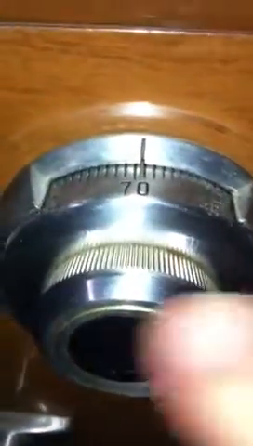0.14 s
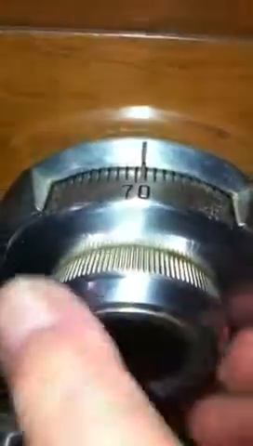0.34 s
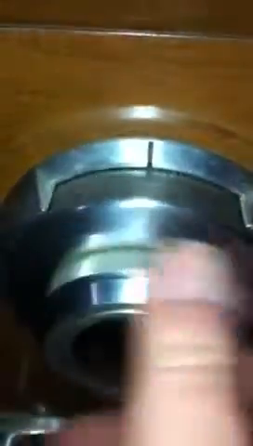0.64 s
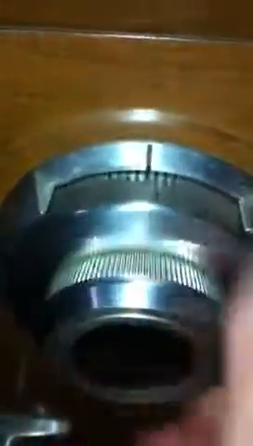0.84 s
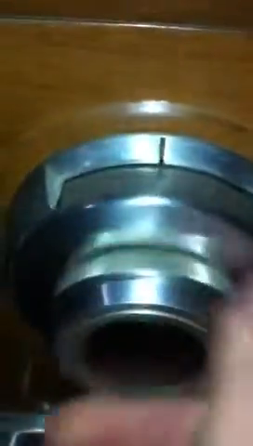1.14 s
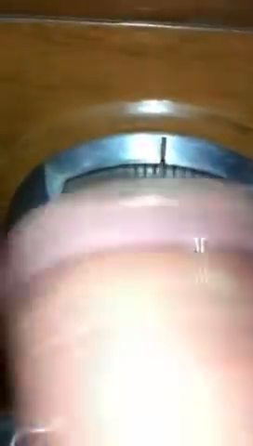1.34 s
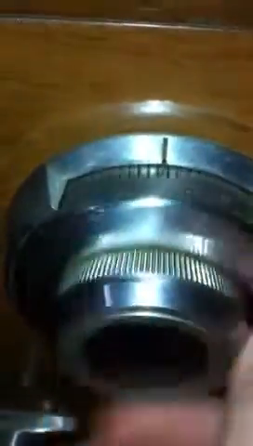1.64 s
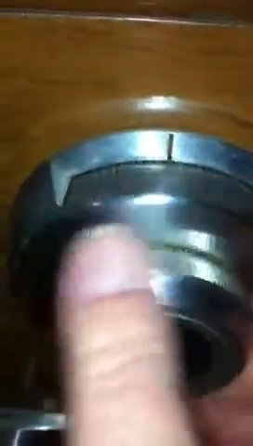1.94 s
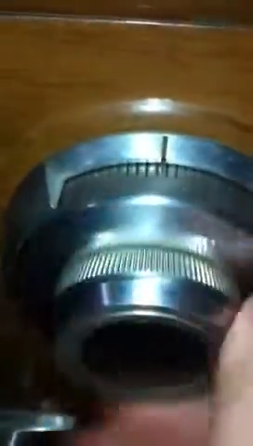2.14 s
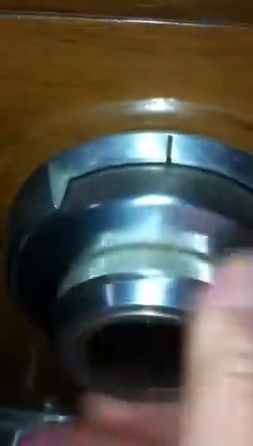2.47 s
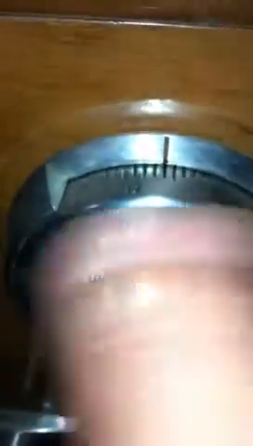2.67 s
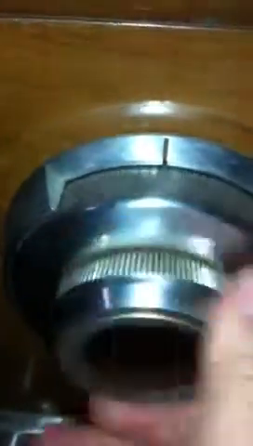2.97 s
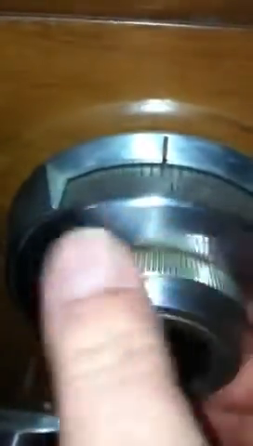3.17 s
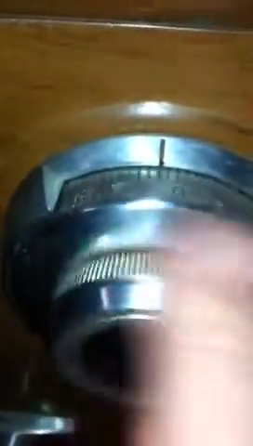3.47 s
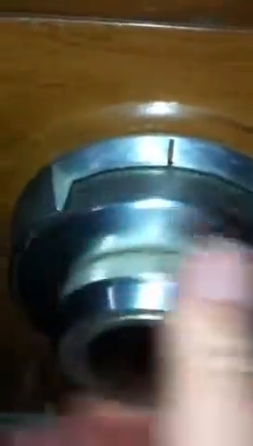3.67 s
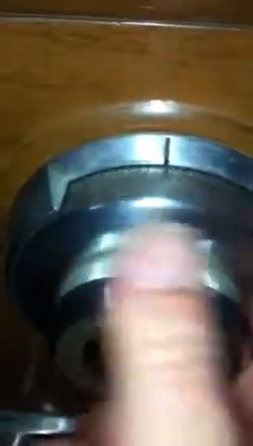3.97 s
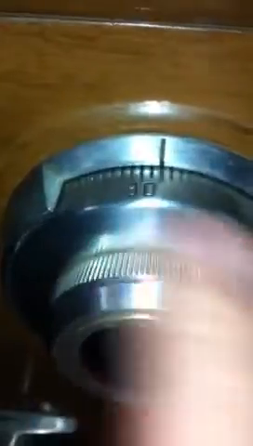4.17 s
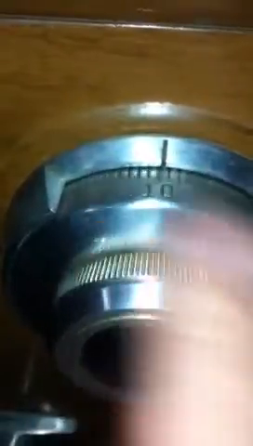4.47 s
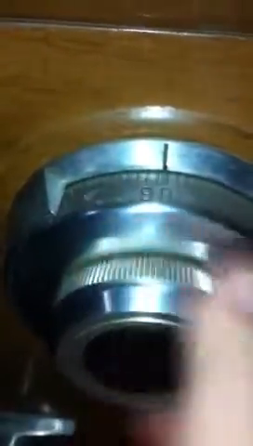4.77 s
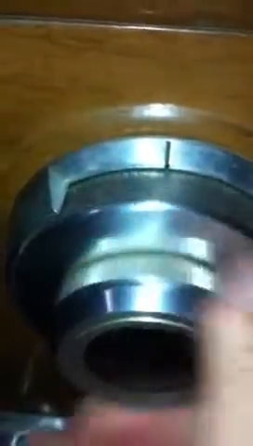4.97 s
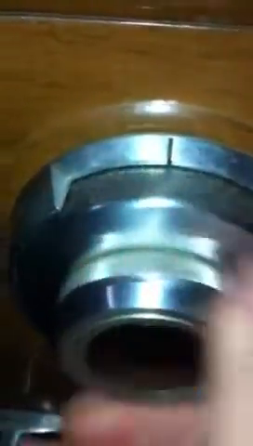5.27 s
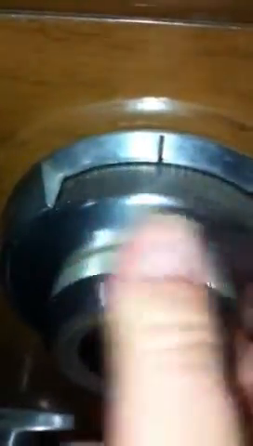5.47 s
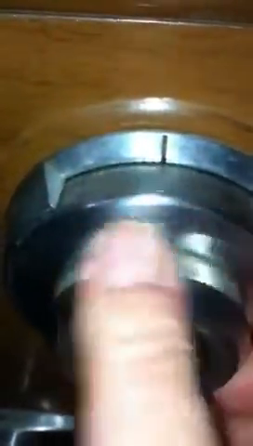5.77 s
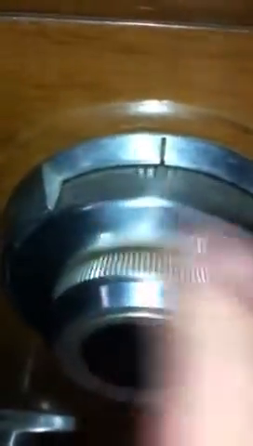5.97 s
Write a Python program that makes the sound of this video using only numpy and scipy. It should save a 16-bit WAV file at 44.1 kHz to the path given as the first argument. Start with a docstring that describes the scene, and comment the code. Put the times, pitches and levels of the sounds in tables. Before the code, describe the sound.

Close metallic ticking and soft scraping as a combination lock dial spins in short strokes, broken by sharp double clacks with a slight ring.

```python
"""A small quiet room: close by, a hand spins the steel dial of a combination safe in short strokes.
The thumb lands on the knob, the spindle rubs and ticks in its play, and once a turn the lock gives
a loud double clack. Each contact rings the dial, knocks the lock case and cracks in the small steel
parts; door plate and spring ring on faintly after a clack. A soft hiss opens; one dry snap falls midway."""
import sys
import numpy as np
from scipy import signal
from scipy.fft import rfft, irfft
from scipy.io import wavfile
from scipy.ndimage import uniform_filter1d

SR = 44100
rng = np.random.default_rng(int(sys.argv[2]) if len(sys.argv) > 2 else 0)


def materialize(psi):
    """Save the field psi as 16-bit PCM at rate SR to the path in sys.argv[1].

    A 1-D psi becomes a single channel; in a 2-D psi each row is a channel.
    """
    bounded = np.clip(np.atleast_2d(psi).T, -1, 1)
    quanta = np.round(bounded * 32767).astype(np.int16)
    wavfile.write(sys.argv[1], SR, quanta)


N = 269892
TIME = np.arange(N) / SR
LEAD_S = .01
HIT_TIME = np.arange(SR // 6) / SR - LEAD_S  # zero at contact


def from_db(db):
    """Decibels to gain."""
    return 10 ** (np.asarray(db) / 20)


def unit_rms(x):
    """Scale to rms 1."""
    return x / np.sqrt(np.mean(x ** 2) + 1e-20)


def at_level(hit, db):
    """Set the level of a hit's loudest 5 ms."""
    return hit * from_db(db) / np.sqrt(uniform_filter1d(hit ** 2, size=220).max())


def add(track, at_s, sound):
    """Mix a sound into the track."""
    start = max(0, round(at_s * SR))
    track[start:start + len(sound)] += sound[:N - start]


def coloured(spectrum, size=N):
    """Steady noise of a given spectral shape, rms 1."""
    hz, db = np.transpose(spectrum)
    bins_hz = np.fft.rfftfreq(size, 1 / SR) + 1
    gain = from_db(np.interp(np.log(bins_hz), np.log(hz), db))
    return unit_rms(irfft(rfft(rng.standard_normal(size)) * gain, size))


def resonate(force, modes):
    """Parallel resonances, alternating in sign."""
    out = 0
    for k, (hz, width_hz, db) in enumerate(modes):
        r = np.exp(-np.pi * width_hz / SR)
        poles = [1, -2 * r * np.cos(2 * np.pi * hz / SR), r * r]
        out += (-1) ** k * from_db(db) * signal.lfilter([1, 0, -1], poles, force) * (1 - r * r) / 2
    return out


# noise spectra: f/Hz, relative density/dB
FLOOR_SPECTRUM = [(18, -42.5), (30, -6.5), (53, -27), (124, 4), (233, 6), (287, -2.5), (540, -1), (844, -8),
                  (1100, -11), (2010, -17), (2480, -17), (2980, -18.5), (10200, -20.5), (14800, -19.5),
                  (16000, -27.5)]
HISS_SPECTRUM = [(150, -31), (250, -5), (386, -1), (597, -9.5), (955, -10), (1060, -9), (2050, -8),
                 (13000, -18.5), (16000, -26)]


def background(floor_db, hiss_db, rise_s, end_s, fade_s):
    """Steady room noise, and a soft hiss that rises, holds and fades."""
    swell = np.clip(np.minimum(TIME / rise_s, (end_s - TIME) / fade_s), 0, 1)
    floor = from_db(floor_db) * coloured(FLOOR_SPECTRUM)
    return floor + from_db(hiss_db) * swell * coloured(HISS_SPECTRUM)


# fingered knob, lock case: f/Hz, width/Hz, gain/dB
KNOB_MODES = [(843, 120, 7), (1310, 130, 0.5), (1572, 45, 3), (1840, 190, -0.5), (2476, 67, 6),
              (3580, 2300, -15.5), (12000, 3500, -18)]
CASE_MODES = [(470, 160, -16), (640, 100, -9), (732, 120, -5), (861, 102, 3), (907, 200, -8),
              (1310, 300, -17)]
# hand strokes: start/s, end/s, level/dB
STROKES = [(0.683, 0.856, -52.5), (1.144, 1.33, -54.5), (2.044, 2.239, -56), (2.483, 2.63, -59.5),
           (2.95, 3.04, -59.5), (3.732, 3.862, -48.5), (4.081, 4.193, -54), (4.401, 4.55, -60),
           (4.678, 4.745, -55.5), (5.301, 5.426, -53.5), (5.619, 5.715, -60.5), (5.869, 6.038, -56)]


def rubbing(slips_per_s, spread_db, clump_db, case_db, grit_db):
    """The turning spindle slips in tiny dry clumps, swelling and fading with each stroke."""
    drift = unit_rms(uniform_filter1d(rng.standard_normal(N), size=500))
    clumps = from_db(clump_db * np.clip(drift, -2, 2))
    sizes = rng.choice([-1, 1], N) * from_db(spread_db * np.minimum(rng.exponential(1, N), 4))
    slips = (rng.random(N) < slips_per_s / SR) * sizes * clumps
    grit = from_db(grit_db) * signal.lfilter(*signal.butter(2, [900, 3600], "band", fs=SR), slips)
    case = from_db(case_db) * resonate(slips, CASE_MODES)
    swell = np.zeros(N)
    for start_s, end_s, db in STROKES:
        progress = np.clip((TIME - start_s) / (end_s - start_s), 0, 1)
        swell += from_db(db) * np.sqrt(np.abs(np.sin(np.pi * progress)))
    return swell * unit_rms(resonate(slips, KNOB_MODES) + case + grit)


def contact_force(grip_s, rattle_db, rattle_s, blow, slide_db=-15, slide_s=0.0026):
    """A short slide, a blow within a burst of micro-impacts, then a settling rattle."""
    rise = np.maximum(HIT_TIME, 0) / grip_s
    slide = from_db(slide_db) * np.exp(-np.abs(HIT_TIME) / slide_s)
    rattle = from_db(rattle_db) * np.exp(-np.abs(HIT_TIME) / rattle_s)
    envelope = rise * np.exp(1 - rise) + np.where(HIT_TIME < 0, slide, rattle)
    force = envelope * rng.standard_normal(len(HIT_TIME))
    force[np.argmax(envelope)] += blow * np.linalg.norm(force)
    return force


# door: f/Hz, width/Hz, gain/dB
DOOR_MODES = [(365, 52, -9.5), (411, 23, -7), (466.8, 9.8, -1), (584, 40, -6)]
# finger landings: t/s, relative slap/dB, relative thud/dB, favoured f/Hz
TAPS = [(0.696, -53.5, -48.5, 476), (1.093, -43.5, -53, 473), (1.129, -56, -48.5, 450),
        (2.404, -54.5, -50, 433), (3.752, -42.5, -44, 542), (4.395, -47.5, -46.5, 454),
        (5.028, -39.5, -42.5, 550), (5.569, -41.5, -49.5, 475), (5.6, -41, -46, 357)]


def finger_taps(slap_trim_db, thud_trim_db, flesh_hz, fall_db_per_octave):
    """A soft finger slaps the knob; the push thuds in the door modes near the pitch it favours."""
    out = np.zeros(N)
    flesh = signal.butter(1, flesh_hz, fs=SR)
    for at_s, slap_db, thud_db, favoured_hz in TAPS:
        force = contact_force(grip_s=0.00082, rattle_db=-10.5, rattle_s=0.013, blow=0.54, slide_db=-24.5)
        door_modes = [(hz, width_hz, db - fall_db_per_octave * abs(np.log2(hz / favoured_hz)))
                      for hz, width_hz, db in DOOR_MODES]
        slap = at_level(signal.lfilter(*flesh, resonate(force, KNOB_MODES)), slap_db + slap_trim_db)
        thud = at_level(resonate(force, door_modes), thud_db + thud_trim_db)
        add(out, at_s - LEAD_S, slap + thud)
    return out


# dense door modes: f/Hz, relative density/dB
CLATTER_SPECTRUM = [(70, -20), (280, -11), (580, 4), (1000, -0.5), (1650, -7.5), (2100, -6.5), (4000, -9.5),
                    (6000, -20), (16000, -42)]


def door_clatter(decay_s, rise_s=0.00045):
    """Many close modes of the door answer at once and die quickly."""
    t = np.maximum(HIT_TIME, 0)
    return coloured(CLATTER_SPECTRUM, len(t)) * (1 - np.exp(-t / rise_s)) * np.exp(-t / decay_s)


# dial, small steel parts: f/Hz, width/Hz, gain/dB
DIAL_MODES = [(1660, 680, -10), (2328, 110, -1.5), (2429, 85, 12.5), (2660, 360, -4.5), (3420, 970, -26)]
STEEL_MODES = [(3890, 99, -11.5), (4220, 73, -6), (4870, 690, -16), (6205, 520, -1.5), (8140, 84, -9.5),
               (8885, 170, -0.5), (9800, 140, -5.5), (10630, 260, -0.5), (12090, 420, -2.5),
               (13300, 480, -18.5), (14500, 690, -5.5), (15600, 550, -23)]


def steel_contacts(rows, grip_s, rattle_db, rattle_s, slide_db, blow, dial_trim_db, case_trim_db,
                   steel_trim_db, edge_db, clatter_db, clatter_s, bright_hz):
    """Steel meets steel: the dial rings, the case knocks, small parts crack, the door clatters."""
    out = np.zeros(N)
    lowpass = signal.butter(1, bright_hz, fs=SR)
    highpass = signal.butter(2, 2900, "high", fs=SR)
    for at_s, dial_db, case_db, steel_db in rows:
        # heavy parts follow the blow, light ones the chatter
        force = contact_force(grip_s, rattle_db - 6, rattle_s, blow, slide_db)
        chatter = contact_force(grip_s, rattle_db, rattle_s, 0, slide_db)
        edge = from_db(edge_db) * signal.lfilter(*highpass, chatter)
        crack = signal.lfilter(*lowpass, resonate(chatter, STEEL_MODES) + edge)
        hit = at_level(resonate(force, DIAL_MODES), dial_db + dial_trim_db)
        hit += at_level(resonate(force, CASE_MODES), case_db + case_trim_db)
        hit += at_level(crack, steel_db + steel_trim_db)
        hit += at_level(door_clatter(clatter_s), (dial_db + case_db) / 2 + clatter_db)
        add(out, at_s - LEAD_S, hit)
    return out


# faint tick, relative to its stroke: dial/dB, case/dB, steel/dB
FAINT_TICK = (1, -0.86, -7)


def faint_tick_rows(gap_s, scatter_db):
    """The loose spindle touches its bearing unevenly through a stroke, harder in a stronger one."""
    rows = []
    for start_s, end_s, db in STROKES:
        times_s = start_s + gap_s * (np.arange(8) + rng.uniform(0, 1, size=8))
        levels_db = db + np.array(FAINT_TICK) + scatter_db * rng.standard_normal(size=(8, 3))
        rows += [(at_s, *parts_db) for at_s, parts_db in zip(times_s, levels_db) if at_s < end_s]
    return rows


# clear spindle ticks, relative levels: t/s, dial/dB, case/dB, steel/dB
TICKS = [(0.747, -44.5, -67, -52.5), (0.77, -44, -77, -52), (0.814, -50.5, -53.5, -62),
         (1.236, -48, -45.5, -43), (1.253, -42.5, -29.5, -35), (1.281, -47, -42, -48),
         (1.3005, -45.5, -54, -44), (1.716, -42, -29.5, -39.5), (2.173, -43, -54, -50),
         (2.503, -48, -50.5, -80), (2.899, -72, -51.5, -73), (2.954, -53.5, -50, -57),
         (2.989, -43.5, -43, -45), (3.0075, -43.5, -36, -38), (3.368, -39, -39.5, -48.5),
         (3.752, -42, -39, -44.5), (3.772, -37.5, -27.5, -42), (3.822, -64.5, -61.5, -48.5),
         (4.062, -44.5, -45.5, -59), (4.491, -49, -38.5, -47.5), (4.703, -44.5, -45.5, -52.5),
         (5.029, -37.5, -36.5, -42), (5.0795, -38.5, -27, -39), (5.3, -59, -43, -56.5),
         (5.347, -41.5, -47, -50), (5.364, -40, -48, -48), (5.391, -44, -45.5, -59),
         (5.941, -40, -43.5, -44), (5.958, -39.5, -33.5, -37.5), (5.986, -64, -42, -48),
         (6.016, -56, -46.5, -46.5)]


def light_ticks(rebounds):
    """Light contacts: the spindle in its play and the lock's rebounds."""
    rows = TICKS + rebounds + faint_tick_rows(gap_s=.045, scatter_db=3)
    return steel_contacts(rows, grip_s=.0014, rattle_db=-15, rattle_s=0.0092, slide_db=-15, blow=0.61,
                          dial_trim_db=0.7, case_trim_db=-3, steel_trim_db=0.25, edge_db=-13,
                          clatter_db=-4.5, clatter_s=0.0099, bright_hz=8905)


# lock turns: catch t/s, strength/dB, slack before catch/s, wait for drop/s, plate/dB, spring/dB
TURNS = [(1.629, 1, .0135, 0.033, -51.5, -65), (3.3938, 0.5, 0.0053, 0.047, -56.5, -54),
         (4.7684, 0.5, .0115, .042, -55, -47)]
# nudges, relative to turn strength: dial/dB, case/dB
CATCH_NUDGE = (-42.5, -36)
DROP_NUDGE = (-35, -41.5)


def nudges(wait_share):
    """Parts take up slack before each catch and drop, too softly to crack: dial and case answer."""
    out = np.zeros(N)
    for catch_s, db, slack_s, wait_s, *_ in TURNS:
        pair = (catch_s - slack_s, CATCH_NUDGE), (catch_s + wait_share * wait_s, DROP_NUDGE)
        for at_s, (dial_db, case_db) in pair:
            force = contact_force(grip_s=0.00078, rattle_db=-21.5, rattle_s=0.011, blow=0.33)
            ring = at_level(resonate(force, DIAL_MODES), db + dial_db)
            knock = at_level(resonate(force, CASE_MODES), db + case_db)
            add(out, at_s - LEAD_S, ring + knock)
    return out


# blows of a clack, relative levels: dial/dB, case/dB, steel/dB
CATCH = (-18, -23.5, -16)
DROP = (-20, -31, -23.5)
SEAT = (-22.5, -32.5, -19.5)


def double_clacks(seat_s, rebound_s, rebound_db):
    """The lock catches, drops and seats; catch and seat spring back once. Gives sound and rebound rows."""
    blows, rebounds = [], []
    for catch_s, db, _, wait_s, *_ in TURNS:
        drop_s = catch_s + wait_s
        catch, drop, seat = (catch_s, CATCH), (drop_s, DROP), (drop_s + seat_s, SEAT)
        for at_s, parts_db in (catch, drop, seat):
            blows.append((at_s, *np.add(parts_db, db)))
        for at_s, parts_db in (catch, seat):
            rebounds.append((at_s + rebound_s, *np.add(parts_db, db + rebound_db)))
    clacks = steel_contacts(blows, grip_s=.0012, rattle_db=-5.5, rattle_s=0.0068, slide_db=-15.5,
                            blow=0.42, dial_trim_db=0, case_trim_db=-2.5, steel_trim_db=-1.75,
                            edge_db=-15, clatter_db=-9, clatter_s=0.017, bright_hz=16820)
    return clacks, rebounds


# door plate, lock spring: f/Hz, relative level/dB, t60/s
PLATE_MODES = [(190, -1, 1.0), (490, 0, 0.46), (945, 0, .35), (1115, -1.5, 0.55), (1405, -20, 0.79),
               (1755, 0, 0.9), (3935, -17, .6)]
SPRING_MODES = [(2110, -8, 0.3), (2110, -1, 0.35), (6100, -18.5, .18), (8900, 1, .14)]


def after_ring():
    """Each drop leaves the lightly damped door plate and spring ringing."""
    out, t = np.zeros(N), TIME[:SR]
    for catch_s, _, _, wait_s, plate_db, spring_db in TURNS:
        for modes, level_db in ((PLATE_MODES, plate_db), (SPRING_MODES, spring_db)):
            hz, db, t60_s = np.transpose(modes)[:, :, None]
            envelopes = from_db(level_db + db + rng.normal(0, 1, hz.shape) - 60 * t / t60_s)
            add(out, catch_s + wait_s, np.sum(envelopes * np.sin(2 * np.pi * hz * t), axis=0))
    return out


def snap(at_s, db, decay_s, hz):
    """A thin dry snap: one sharp step that dies at once."""
    out, t = np.zeros(N), HIT_TIME + LEAD_S
    add(out, at_s, at_level(np.exp(-t / decay_s) * np.cos(2 * np.pi * hz * t), db))
    return out


# room response: f/Hz, band gain/dB, t60/s
ROOM_BANDS = [(100, 2, 0.53), (190, 6.5, 1), (396, 0, 0.57), (830, -19, 0.36), (1450, -12, 0.37),
              (2466, -10.5, 0.16), (4435, -15, 0.094), (9000, -24, 0.3), (16000, -20, 0.12)]


def room(x, build_s):
    """Diffuse reflections build up and die band by band, the lows lasting longest."""
    # little of the small dial's ring reaches the walls
    carried = signal.lfilter(*signal.butter(1, [2150, 2800], "bandstop", fs=SR), x)
    t, response = TIME[:SR], 0
    hz, db, t60_s = np.transpose(ROOM_BANDS)
    edges_hz = np.geomspace(62.5, 16000, 17)
    for low_hz, high_hz in zip(edges_hz, edges_hz[1:]):
        log_centre = np.log(low_hz * high_hz) / 2
        gain = from_db(np.interp(log_centre, np.log(hz), db))
        decay = from_db(-60 * t / np.interp(log_centre, np.log(hz), t60_s))
        envelope = decay * (1 - np.exp(-t / build_s))
        band = signal.butter(2, [low_hz, high_hz], "band", fs=SR, output="sos")
        noise = signal.sosfilt(band, rng.standard_normal(SR))
        response += gain * noise * envelope / np.linalg.norm(envelope)
    return signal.fftconvolve(carried, response)[:N]


def scene():
    """Hand, lock, room and background, in mono."""
    noise = background(floor_db=-61, hiss_db=-56, rise_s=0.018, end_s=0.62, fade_s=0.21)
    clacks, rebounds = double_clacks(seat_s=0.0041, rebound_s=0.0076, rebound_db=-13)
    handling = nudges(wait_share=.68)
    handling += finger_taps(slap_trim_db=3.5, thud_trim_db=2.5, flesh_hz=6100, fall_db_per_octave=24.5)
    handling += rubbing(slips_per_s=1100, spread_db=1.5, clump_db=5, case_db=-5.5, grit_db=-10.5)
    ringing = after_ring()
    handling += light_ticks(rebounds)
    dry_snap = snap(at_s=3.547, db=-41, decay_s=0.00087, hz=300)
    reflections = room(clacks + from_db(1) * handling, build_s=0.0059)
    return (noise + handling + clacks + ringing + dry_snap + reflections)[None]


def record(dry):
    """Steep low-pass at 16.2 kHz."""
    return signal.sosfilt(signal.ellip(10, .1, 80, 16200, fs=SR, output="sos"), dry)


dry = scene()
out = record(dry)
materialize(out)
```